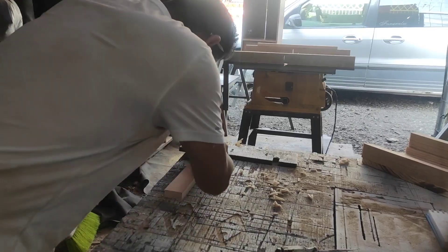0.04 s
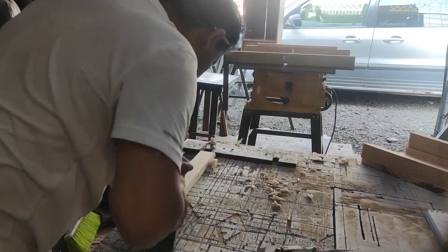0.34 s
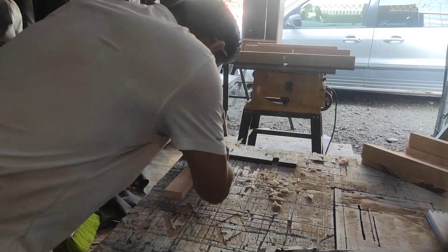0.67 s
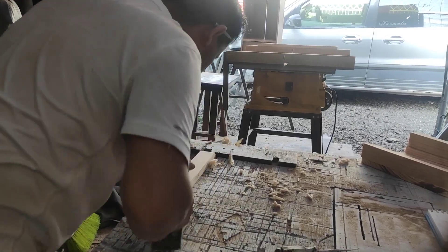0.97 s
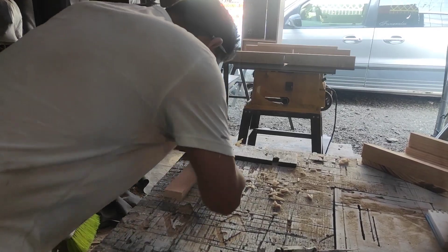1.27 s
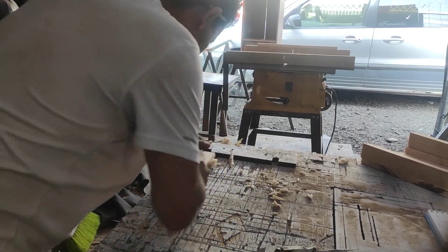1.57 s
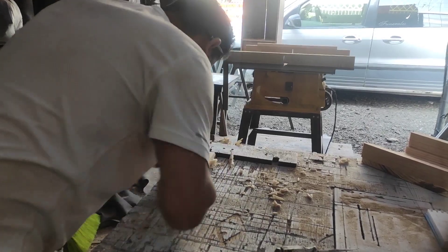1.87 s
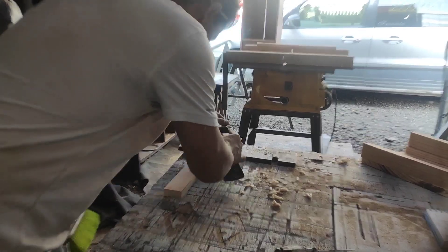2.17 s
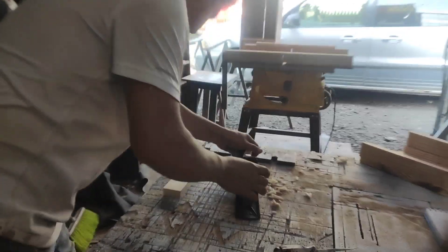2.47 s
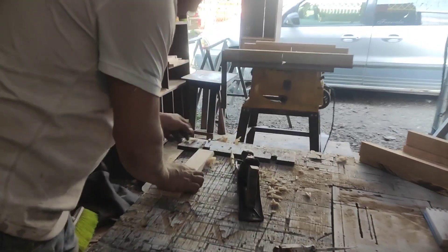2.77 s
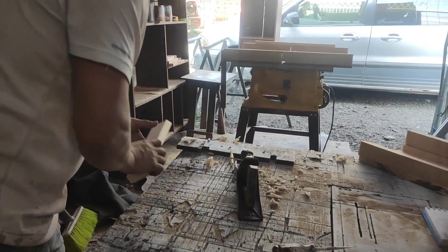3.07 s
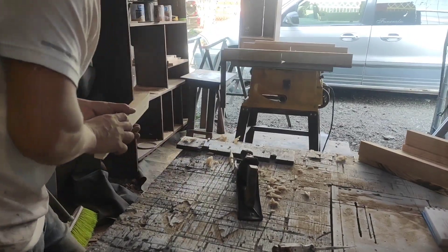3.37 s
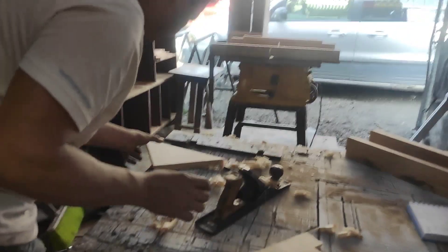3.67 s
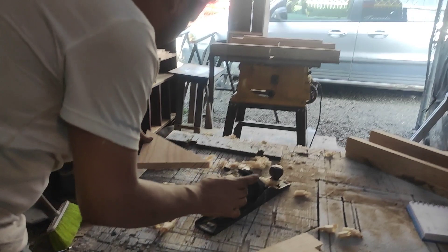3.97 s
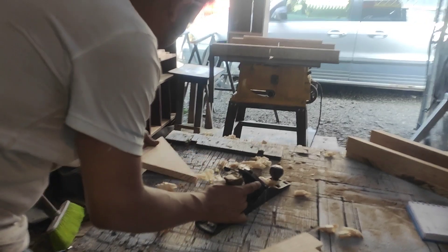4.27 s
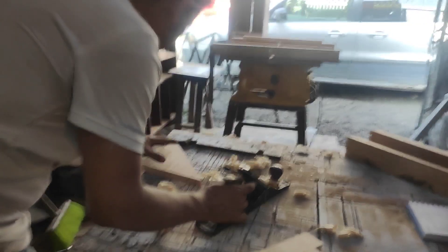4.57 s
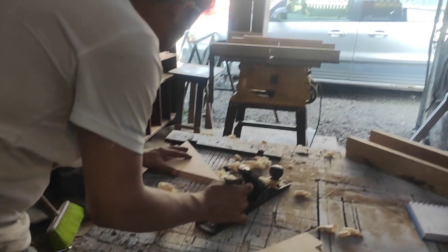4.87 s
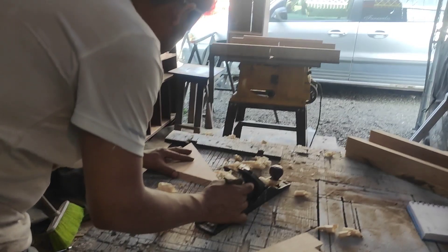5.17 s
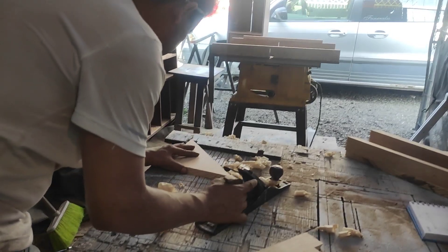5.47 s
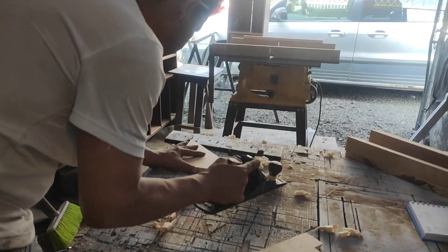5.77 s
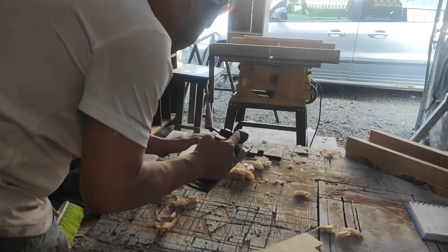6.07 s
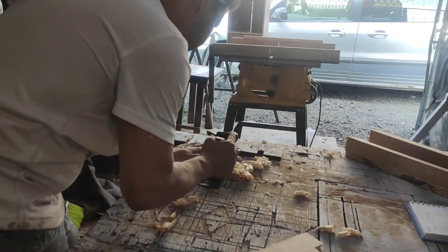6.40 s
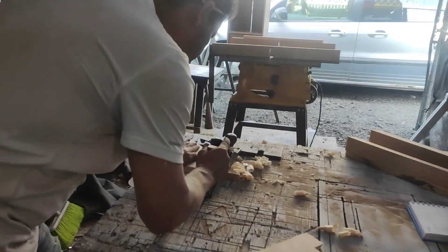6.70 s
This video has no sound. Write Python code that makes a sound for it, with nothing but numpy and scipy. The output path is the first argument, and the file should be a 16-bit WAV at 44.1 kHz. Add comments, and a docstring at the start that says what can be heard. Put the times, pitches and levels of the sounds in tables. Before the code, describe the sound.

Close by in a small workshop open to a quiet street, a hand plane rasps through wood four times, fibres tearing and shavings curling off. The planing stops and the tool clunks down on the bench. One loud wooden clack follows, then light sliding, faint squeaks and scattered knocks as the board is repositioned, and finally the plane knocks down onto the wood again.

```python
"""Hand plane on pine

A metal plane takes four shavings off a pine board: fibres snap, the curl sings, the sole rubs back.
The plane is set down on the wooden bench, a board is dropped, turned and shifted, and the plane
lands on it again. Blows ring bench, board and plane; slides hiss, rumble and faintly squeak.
The workshop is small and open to a quiet street."""
import sys
import numpy as np
from scipy import signal
from scipy.fft import rfft, irfft
from scipy.io import wavfile
from scipy.ndimage import uniform_filter1d

SR = 44100
rng = np.random.default_rng(int(sys.argv[2]) if len(sys.argv) > 2 else 0)


def wav_record(signal):
    """Record a signal, one row per channel, as 16-bit PCM in the file named by sys.argv[1]."""
    frames = np.transpose(np.atleast_2d(signal))
    bounded = np.clip(frames, -1, 1)
    # unit amplitude maps onto the largest positive 16-bit level
    quanta = np.round(bounded * 32767).astype(np.int16)
    wavfile.write(sys.argv[1], SR, quanta)


N = 306054
TIME_S = np.arange(N) / SR
FREQS_HZ = np.maximum(np.fft.rfftfreq(N, 1 / SR), 1)

# wood modes: freq_hz, level_db, t60_s
BENCH_MODES = [(78.8, -13, 0.38), (109.2, -18.5, 0.11), (145.6, -2.5, 0.16), (166, -4, 0.14),
               (197, -2.5, 0.15), (225.9, -3, 0.12)]
BOARD_MODES = [(298.1, 6, 0.15), (439.2, -2, 0.09), (479.3, -7.5, 0.13), (550, -19, 0.099), (614, -24, 0.2),
               (1005, -13, 0.094), (1450, -8, 0.027), (1710, -39, 0.082), (2020, -30, 0.049)]
# dull wood spectrum: freq_hz, density_db
THUD_SPECTRUM = [(35, -30), (80, -12.5), (140, 7.5), (200, 1), (250, -7.5), (305, -0.5), (360, -6.5),
                 (500, -12.5), (800, -19), (1500, -57)]


def from_db(db):
    """Decibels to gain."""
    return 10 ** (np.asarray(db) / 20)


def rms_one(x):
    """Scale to unit rms."""
    return x / np.sqrt(np.mean(x ** 2) + 1e-20)


def on_freqs(points):
    """Interpolate (freq_hz, value) rows over log frequency."""
    hz, value = np.transpose(points)
    return np.interp(np.log(FREQS_HZ), np.log(hz), value)


def in_time(points):
    """Interpolate (time_s, value) rows at every sample."""
    return np.interp(TIME_S, *np.transpose(points))


def flutter(rate_hz, depth_db):
    """Randomly wandering gain, unit rms."""
    slow = irfft(rfft(rng.standard_normal(N)) / (1 + (FREQS_HZ / rate_hz) ** 2), N)
    return rms_one(from_db(depth_db * rms_one(slow)))


def noise(spectrum, colour=1):
    """Shaped stereo noise, alike in the bass, diffuse in the treble; mid at unit rms."""
    # left-right likeness: freq_hz, correlation
    likeness = [(30, 0.1), (60, 0.72), (130, 0.65), (300, 0.86), (650, 0.36), (1300, 0.1), (2500, 0.12),
                (4500, -0.03), (14000, -0.05)]
    alike = on_freqs(likeness)
    shaped = rfft(rng.standard_normal((2, N))) * from_db(on_freqs(spectrum)) * colour
    mid, side = irfft(shaped * np.sqrt([1 + alike, 1 - alike]), N)
    return np.array([mid + side, mid - side]) / np.std(mid)


def resonant(peaks):
    """Colour that resonances add to a flat spectrum."""
    powers = (from_db(db) ** 2 / (1 + (2 * (FREQS_HZ - hz) / width_hz) ** 2)
              for hz, width_hz, db in peaks)
    return np.sqrt(1 + sum(powers))


def ripple(spacing_hz, depth_db):
    """Spectral ripple of many weak modes and reflections, separate for mid and side."""
    knots_hz = np.arange(0, SR / 2, spacing_hz)
    heights = rng.standard_normal((2, 4096))[:, :len(knots_hz)]
    return from_db(depth_db * np.array([np.interp(FREQS_HZ, knots_hz, row) for row in heights]))


def over_grain(x, depth_db):
    """Narrow spectral patches swell and fade as the contact crosses the grain."""
    cells = signal.stft(x, nperseg=1024, noverlap=896)[2]
    patches = uniform_filter1d(rng.standard_normal(cells.shape[1:]), size=9, axis=0)
    patches = uniform_filter1d(patches, size=11, axis=1)
    cells *= from_db(depth_db * rms_one(patches))
    return signal.istft(cells, nperseg=1024, noverlap=896)[1][:, :N]


def moving_resonance(x, centre_hz, width_hz):
    """Band-pass retuned block by block, output at unit rms."""
    radius = np.exp(-np.pi * width_hz / SR)
    out, state = np.zeros_like(x), np.zeros((2, 2))
    for i in range(0, N, 128):
        block = slice(i, i + 128)
        poles = [1, -2 * radius * np.cos(2 * np.pi * centre_hz[i] / SR), radius ** 2]
        out[:, block], state = signal.lfilter([1, 0, -1], poles, x[:, block], zi=state)
    return rms_one(out)


def stroke(start_s, length_s, attack_s, swell_db, fall_db_per_s):
    """Gain of one hand movement: sets in, swells or eases, dies away."""
    t = TIME_S - start_s
    along = np.clip(t / length_s, 0, 1) - .5
    fall_db = fall_db_per_s * np.maximum(t - length_s, 0)
    return np.clip(t / attack_s, 0, 1) * from_db(swell_db * along - fall_db)


def leaning(lift_s=2.304, fall_db_per_s=225):
    """Unit gain while the plane bears on the board, fading as it lifts."""
    return from_db(-fall_db_per_s * np.maximum(TIME_S - lift_s, 0))


def blows(times_s, level_db):
    """One impulse per blow."""
    clicks = np.full(N, 1e-18)
    clicks[np.round(times_s * SR).astype(int)] = from_db(level_db)
    return clicks


def dying(clicks, t60_s, rise_s):
    """Envelope after blows: quick swell, exponential decay."""
    power = signal.lfilter([1], [1, -from_db(-120 / (t60_s * SR))], clicks ** 2)
    pole = np.exp(-1 / (rise_s * SR))
    return signal.lfilter([1 - pole], [1, -pole], np.sqrt(power))


def ring(clicks, modes, rise_s):
    """Decaying modes that swell as the blow spreads."""
    t = TIME_S[:SR]
    rings = sum((-1) ** k * from_db(db - 60 * t / t60_s) * np.sin(2 * np.pi * hz * t)
                for k, (hz, db, t60_s) in enumerate(modes))
    return signal.fftconvolve(clicks, rings * (1 - np.exp(-t / rise_s)))[:N]


def workshop(x, t60_s, wet_db):
    """Add diffuse reflections, different on each side."""
    t = TIME_S[:SR]
    tail = rng.standard_normal((2, SR)) * from_db(-60 * t / t60_s) * (t > .006)
    tail /= np.sqrt(np.sum(tail ** 2, axis=1, keepdims=True))
    return x + from_db(wet_db) * signal.fftconvolve(np.atleast_2d(x), tail, axes=1)[:, :N]


def street(wash_db=-48.5, fade_db_per_s=0.62, hum_hz=104.6, hum_trim_db=-2):
    """Slowly sinking outdoor wash; a wavering hum comes and goes."""
    # outdoor wash: freq_hz, density_db
    wash_spectrum = [(12, -4.5), (20, 3), (70, 4), (111, -1), (155, -1.5), (211, -5), (445, -10.5),
                     (865, -17), (1350, -23), (5850, -34), (7100, -33.5), (8620, -46.5), (13800, -39),
                     (15000, -79.5)]
    # hum envelope: time_s, level_db
    hum_levels = [(0, -51.5), (1.8, -54), (2.1, -45), (2.4, -42.5), (3.0, -42.5), (3.2, -60.5), (6.94, -84)]
    phase = 2 * np.pi * np.cumsum(hum_hz * flutter(rate_hz=4.2, depth_db=0.23)) / SR
    waver = flutter(rate_hz=19, depth_db=4)
    hum = from_db(hum_trim_db + in_time(hum_levels)) * np.sqrt(2) * np.sin(phase) * waver
    wash = noise(wash_spectrum, ripple(spacing_hz=23.22, depth_db=3.5))
    return from_db(wash_db - fade_db_per_s * TIME_S) * wash + hum


def squeaks(width_hz=550):
    """Friction feeds one narrow resonance of the sliding piece."""
    # singing edges: start_s, length_s, pitch_hz, level_db
    edges = [(2.365, 0.059, 3600, -62), (2.97, 0.24, 4340, -63), (5.764, 0.019, 6040, -64.5),
             (6.72, 0.029, 6150, -66)]
    out = 0
    for start_s, length_s, hz, db in edges:
        band = rfft(rng.standard_normal((2, N))) / (1 + (2 * (FREQS_HZ - hz) / width_hz) ** 2)
        gain = from_db(db) * stroke(start_s, length_s, attack_s=0.015, swell_db=4, fall_db_per_s=404)
        out += gain * rms_one(irfft(band, N))
    return out


def sliding(rub_trim_db=-1, rumble_trim_db=-4, ring_db=3.5, treble_hz=4200):
    """Things dragged over the dusty bench hiss; dragging and planing rumble the wood's modes."""
    # drags: start_s, length_s, hiss_db, extra_treble_db, rumble_db
    slides = [(2.414, 0.098, -55.5, -5, -55), (2.764, 0.15, -60.5, -5.5, -49.5),
              (2.894, 0.092, -61, -4, -36), (2.988, 0.21, -61, 1, -63), (3.311, 0.18, -62.5, 5.5, -56),
              (3.702, 0.14, -63, -7, -56), (3.868, 0.12, -57, 4.5, -58), (4.234, 0.19, -56, -4, -41.5),
              (4.706, 0.135, -54, -1, -43), (4.916, 0.056, -67, 0, -44), (5.132, 0.087, -63, -3.5, -49),
              (5.273, 0.16, -62.5, -1, -47.5), (5.48, 0.11, -69.5, 5, -73), (5.574, 0.13, -64.5, 4, -59),
              (6.072, 0.034, -62, -19, -51), (6.221, 0.21, -66.5, 2.5, -53.5), (6.69, 0.061, -66, 2.5, -58),
              (6.8, 0.19, -55.5, -16.5, -50.5)]
    moves = np.array([stroke(start_s, length_s, attack_s=0.048, swell_db=3, fall_db_per_s=196)
                      for start_s, length_s, *_ in slides])
    hiss_db, treble_db, drag_db = np.transpose(slides)[2:]
    # friction hiss: freq_hz, density_db
    rub_spectrum = [(350, -42), (600, -2), (715, -11), (961, -9), (1180, -7.5), (1650, -6.5), (6420, -8),
                    (8750, -23.5), (13800, -25.5), (15000, -40)]
    colour = resonant([(4380, 190, 1.5)]) * ripple(spacing_hz=60.03, depth_db=2)
    hiss = over_grain(noise(rub_spectrum, colour), depth_db=3)
    dull = irfft(rfft(hiss) / (1 + (FREQS_HZ / treble_hz) ** 4), N)
    rub = from_db(hiss_db) @ moves * dull + from_db(hiss_db + treble_db) @ moves * (hiss - dull)
    wood = resonant([(hz, np.log(1000) / (np.pi * t60_s), db + ring_db)
                     for hz, db, t60_s in BENCH_MODES + BOARD_MODES])
    plane_drag = from_db(-48) * leaning() * flutter(rate_hz=8.7, depth_db=0.5)
    rub *= flutter(rate_hz=150, depth_db=1)
    rumble = (from_db(drag_db) @ moves + plane_drag) * noise(THUD_SPECTRUM, wood)
    return from_db(rub_trim_db) * rub + from_db(rumble_trim_db) * rumble


def knocks(thud_trim_db=-8, boom_trim_db=-29, clack_trim_db=-3, crack_trim_db=-22, tick_trim_db=-14.5):
    """Blows ring bench, board and plane; crowded upper modes clack, loose things chatter."""
    # impacts: time_s, bench_db, board_db, plane_db, clack_db, clack_hz
    impacts = [(0.127, -43, -42, -58, -52, 900), (0.525, -40, -42, -60, -72, 608),
               (0.834, -38, -68, -48, -50, 592), (1.101, -41.5, -43.5, -57, -58, 895),
               (1.536, -36, -41.5, -57, -51, 721), (1.604, -39, -46.5, -65, -40.5, 1116),
               (1.857, -40.5, -53, -58, -40, 1486), (2.45, -22, -29.5, -54, -42.5, 1150),
               (2.492, -22.5, -31, -59, -47, 1150), (2.573, -33, -54, -63, -47, 650),
               (2.620, -16, -24, -47, -30.5, 1200), (2.638, -13.5, -17.5, -42, -27, 1050),
               (2.669, -25, -37, -35, -42, 970), (3.533, -17.5, -9.5, -35, -10, 994),
               (3.881, -40.5, -43, -67, -60, 697), (4.272, -30, -40.5, -45.5, -31, 748),
               (4.502, -27, -22, -45, -25.5, 890), (4.541, -15.5, -12.5, -28.5, -17.5, 980),
               (4.584, -40, -23.5, -31, -28.5, 1070), (5.360, -44, -44, -39.5, -47.5, 458),
               (5.428, -35, -37, -46, -49, 400), (6.298, -37, -35, -36, -43, 560),
               (6.518, -20.5, -30, -24, -16, 540), (6.542, -26, -24, -37, -29.5, 930)]
    # plane body: freq_hz, level_db, t60_s
    plane_modes = [(128, 0.5, 0.16), (375.6, -3.5, 0.13), (410, -7, 0.21), (512.4, 1, 0.083),
                   (638, -5, 0.06), (754, -13, 0.037), (895, -15.5, 0.037), (1220, -30, 0.096)]
    # wooden clack and treble crack: freq_hz, density_db
    clack_spectrum = [(200, 3.5), (380, 4), (520, 8), (700, 3.5), (1000, -4.5), (1200, -5), (1500, -5.5),
                      (2100, -5.5), (3000, -5.5), (6000, -23)]
    crack_spectrum = [(700, 5.5), (1800, 12.5), (3000, 2.5), (5000, 1.5), (7000, -2), (8500, -24),
                      (14500, -44)]
    times_s, bench_db, board_db, plane_db, clack_db, clack_hz = np.transpose(impacts)
    body = ring(blows(times_s, bench_db), BENCH_MODES, rise_s=0.0085)
    body += ring(blows(times_s, board_db), BOARD_MODES, rise_s=0.012)
    body += ring(blows(times_s, plane_db), plane_modes, rise_s=0.0026)
    energy = np.sum(from_db([bench_db, board_db, plane_db]) ** 2, axis=0)
    weight = blows(times_s, 10 * np.log10(energy))
    thud = from_db(thud_trim_db) * dying(weight, t60_s=0.23, rise_s=0.00084) * noise(THUD_SPECTRUM)
    boom = from_db(boom_trim_db) * dying(weight, t60_s=0.58, rise_s=0.03) * noise(THUD_SPECTRUM)
    # the spot struck decides which upper modes stand out
    latest = np.maximum(np.searchsorted(times_s, TIME_S) - 1, 0)
    upper = noise(clack_spectrum, ripple(spacing_hz=30.2, depth_db=2.5))
    upper = moving_resonance(upper, clack_hz[latest], width_hz=400)
    clack = from_db(clack_trim_db) * dying(blows(times_s, clack_db), t60_s=0.15, rise_s=0.00077) * upper
    sharp = blows(times_s, 0.77 * clack_db)  # crack grows more slowly than clack
    crack = from_db(crack_trim_db) * dying(sharp, t60_s=0.21, rise_s=0.0004)
    crack = crack * noise(crack_spectrum, ripple(spacing_hz=71.6, depth_db=2.5))
    # first touch of two hard faces
    tick = from_db(tick_trim_db) * dying(sharp, t60_s=0.0054, rise_s=0.00011) * noise(crack_spectrum)
    chatter = flutter(rate_hz=86, depth_db=0.5)
    return workshop(body, t60_s=0.04, wet_db=-6) + thud + boom + chatter * (clack + crack) + tick


def sole_rub(iron, trim_db=-1.74):
    """The sole rubs faintly throughout the planing, louder as it slides back."""
    # return strokes: start_s, length_s, level_db, swell_db
    returns = [(0.265, 0.17, -56.5, 20.5), (0.888, 0.2, -50.5, 12), (1.614, 0.16, -48.5, 2)]
    # sole on pine: freq_hz, density_db
    sole_spectrum = [(290, -46.5), (500, -12), (619, -3.5), (1160, -3), (1240, -1), (2960, -1.5),
                     (4170, -6.5), (6570, -5), (8370, -16.5), (14000, -19), (15000, -43)]
    back = sum(from_db(db) * stroke(start_s, length_s, 0.021, swell_db, fall_db_per_s=225)
               for start_s, length_s, db, swell_db in returns)
    gain = from_db(trim_db) * np.hypot(back, from_db(-64) * leaning())
    catches = flutter(rate_hz=190, depth_db=0.5) * flutter(rate_hz=55, depth_db=1)
    return gain * catches * over_grain(noise(sole_spectrum, iron ** 0.65), depth_db=3.5)


def cut_curves(fastest_at=0.56, catch_s=0.034):
    """Tear gain, shaving gain and pitch: pitch follows speed; the shaving catches as the plane slows."""
    # cuts: start_s, length_s, bite_s, tear_db, shaving_db, catch_db, bite_hz, full_speed_hz, end_hz
    cuts = [(-0.015, 0.14, 0.027, -36, -31, -49, 3170, 3150, 2730),
            (0.593, 0.19, 0.033, -35.5, -32, -33, 2560, 4700, 2080),
            (1.245, 0.21, 0.04, -35, -32, -35, 4100, 4500, 1170),
            (1.928, 0.22, 0.054, -35.5, -36.5, -55, 3850, 4100, 3000)]
    tear, shaving, pitch = 0, 0, []
    for start_s, length_s, bite_s, tear_db, shaving_db, catch_db, bite_hz, full_hz, end_hz in cuts:
        end_s = start_s + length_s
        # eases as the arm extends, dies once the iron leaves the wood
        push = stroke(start_s, length_s, bite_s, swell_db=-4.5, fall_db_per_s=367)
        catch = from_db(catch_db) * np.exp(-((TIME_S - end_s + catch_s / 2) / catch_s) ** 2)
        tear += from_db(tear_db) * push
        shaving += np.hypot(from_db(shaving_db) * push, catch)
        pitch += [(start_s, bite_hz), (start_s + fastest_at * length_s, full_hz),
                  (end_s, end_hz), (end_s + length_s, end_hz)]
    return tear, shaving, in_time(pitch)


def planing(tear_trim_db=-1.4, shaving_trim_db=-2.5, pan_db=-0.25):
    """Fibres snap in uneven runs and ring the plane; the shaving sings as it curls; the sole rubs."""
    # iron and casting resonances: freq_hz, width_hz, level_db
    iron_peaks = [(2198, 11, 11), (2565, 62, 4), (2650, 17, 4), (3030, 21, 4), (3608, 22, 8),
                  (3920, 45, 8.5), (4560, 110, 7), (5360, 41, 1), (6480, 48, 5.5), (8360, 27, 3.5),
                  (10600, 130, -2)]
    # tearing fibres and curling shaving: freq_hz, density_db
    tear_spectrum = [(300, -9), (800, -12), (1400, -6.5), (2500, -3), (4400, -2.5), (5800, -1), (7200, -3),
                     (8300, -15), (9500, -16.5), (11000, -13.5), (12500, -16), (14500, -23)]
    curl_spectrum = [(500, -17), (1300, 9.5), (4000, -1), (8000, 5.5)]
    tear_gain, shaving_gain, pitch_hz = cut_curves()
    iron = resonant(iron_peaks) * ripple(spacing_hz=35.98, depth_db=3.5)
    snaps = flutter(rate_hz=400, depth_db=0.5) * flutter(rate_hz=29, depth_db=-0.45)
    tearing = from_db(tear_trim_db) * tear_gain * over_grain(noise(tear_spectrum, iron), depth_db=2.5)
    # the curl buckles against the chip breaker, so its resonance jumps
    curl_hz = pitch_hz * flutter(rate_hz=38, depth_db=-0.65)
    curl = moving_resonance(noise(curl_spectrum, iron), curl_hz, width_hz=810)
    shaving = from_db(shaving_trim_db) * shaving_gain * curl
    return (snaps * (tearing + shaving) + sole_rub(iron)) * from_db([[pan_db], [-pan_db]])


def scene():
    """Bench work over the street's wash."""
    return planing() + sliding() + squeaks() + knocks() + street()


def record(dry, cutoff_hz=14450):
    """Two microphone ports of unequal colour, then a steep low-pass."""
    # port sensitivity: freq_hz, left_minus_right_db
    ports = [(30, 10.5), (60, 4), (125, 2), (400, -1.5), (2000, 1.16), (14000, -1.5)]
    heard = irfft(rfft(dry) * from_db(on_freqs(ports) * [[.5], [-.5]]), N)
    return signal.sosfilt(signal.ellip(12, .1, 90, cutoff_hz, fs=SR, output="sos"), heard)


dry = scene()
out = record(dry)
wav_record(out)
```